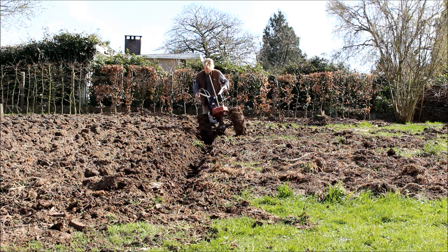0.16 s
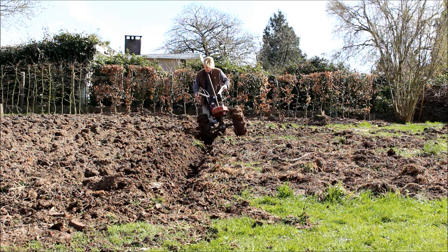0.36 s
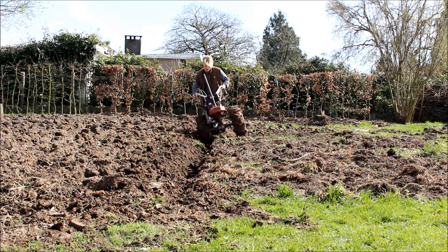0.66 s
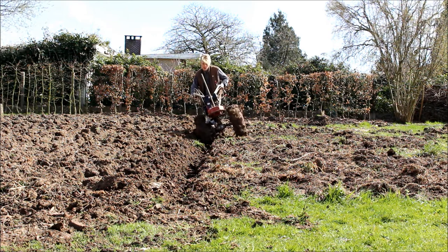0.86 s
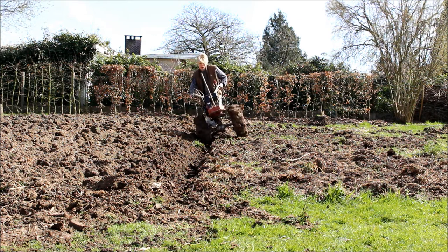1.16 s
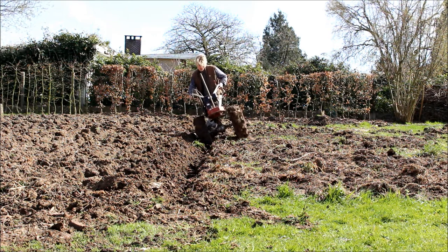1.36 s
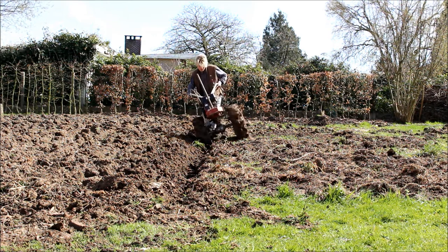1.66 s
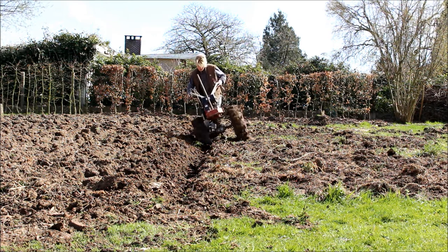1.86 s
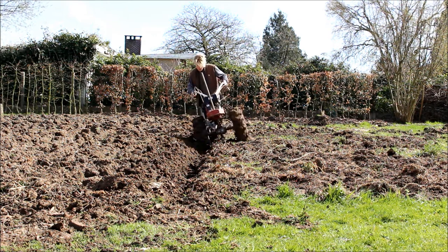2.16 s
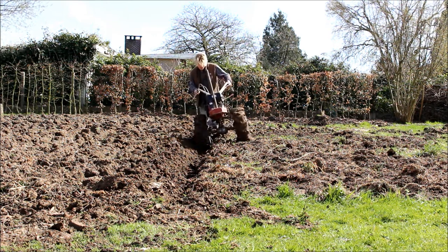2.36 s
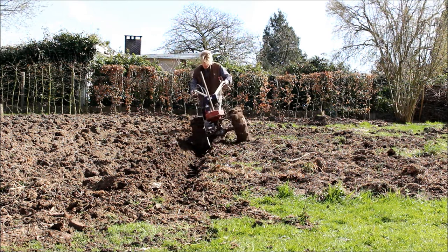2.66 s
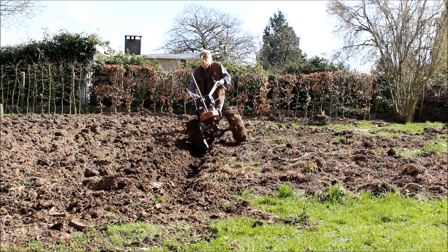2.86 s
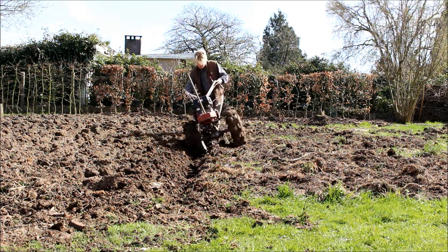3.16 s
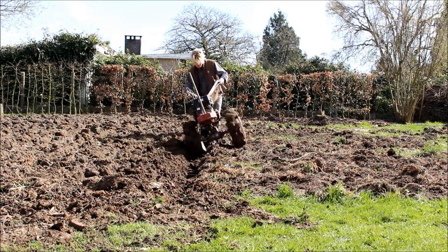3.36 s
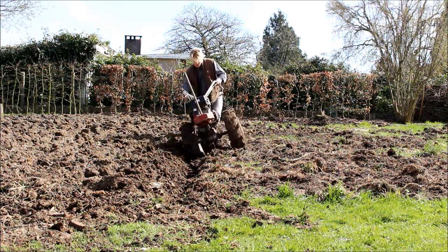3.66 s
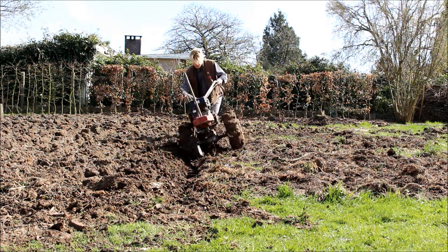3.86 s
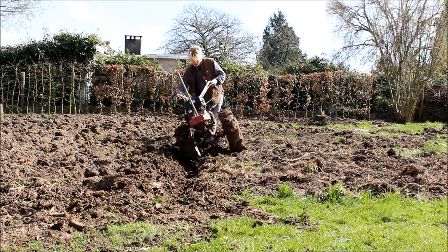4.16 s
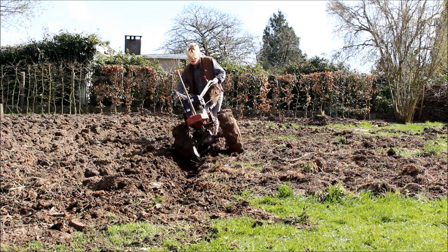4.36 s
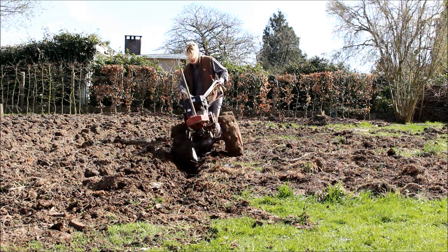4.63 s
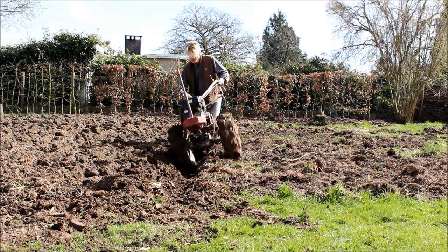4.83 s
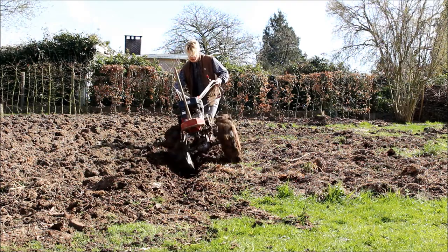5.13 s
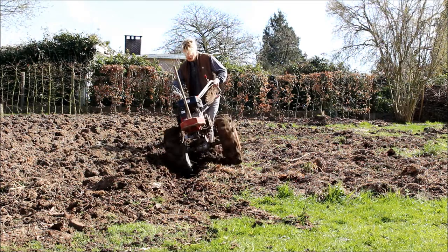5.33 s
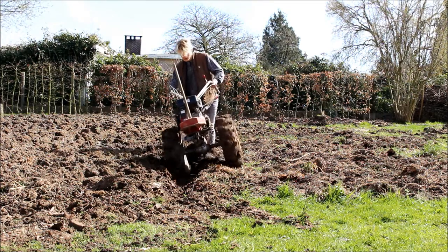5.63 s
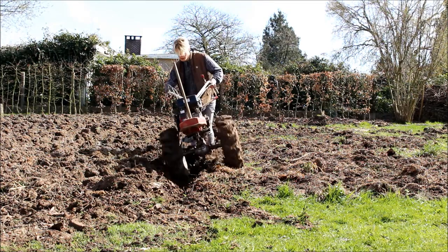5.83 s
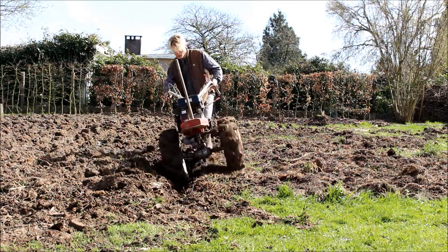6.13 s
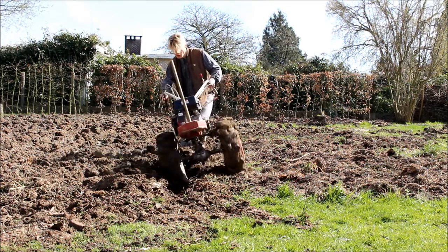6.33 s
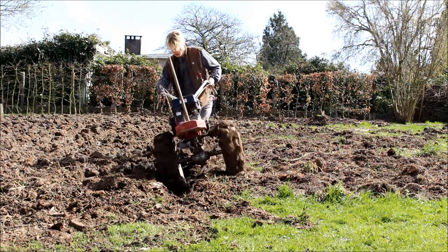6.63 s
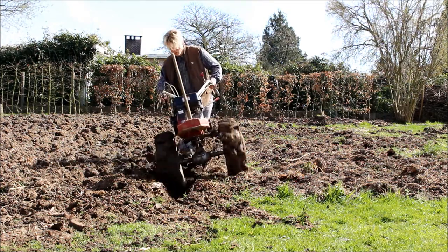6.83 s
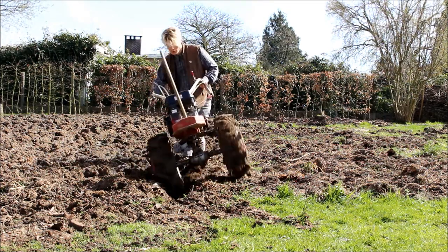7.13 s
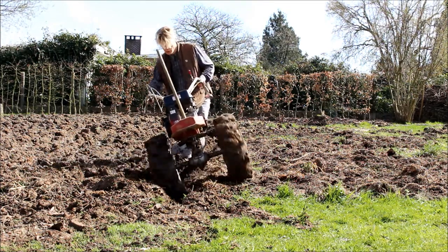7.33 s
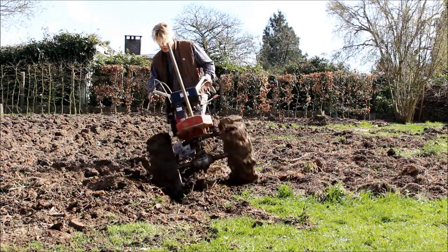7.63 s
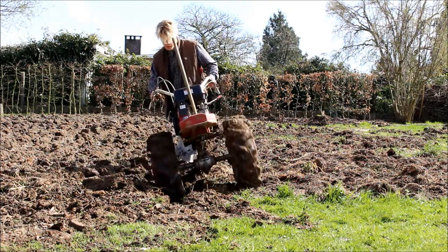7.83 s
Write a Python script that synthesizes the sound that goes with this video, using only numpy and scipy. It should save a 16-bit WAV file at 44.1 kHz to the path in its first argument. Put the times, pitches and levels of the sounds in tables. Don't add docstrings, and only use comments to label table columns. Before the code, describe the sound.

A small one-cylinder engine runs throughout in an open garden, firing nearly thirty times a second in a dry, rapid putter. Tin covers rattle, a broad fan and casing roar throbs with the firings, and a faint gear whine rides along. About twice a second the revs sag, then the throttle kicks and a few harder knocks crack out. From 0 to 1 s the engine is mostly clear with slight wind. From about 1.1 to 2.9 s, low gusts flutter, thump and tear at the camera microphone, mainly on the right, ducking the motor. From 3 to 4.8 s it returns clearly, with isolated left-side puffs. Gusts buffet again from 5 to 6.6 s, around stronger knocks. From 6.7 to 8 s the wind is lighter and the engine closer, fuller in the mids and still surging, without stopping. Close hedges and soil give slight scattered reflections.

```python
import sys
import numpy as np
from scipy import signal
from scipy.fft import rfft, irfft, next_fast_len
from scipy.io import wavfile
from scipy.ndimage import uniform_filter1d

SR = 44100
rng = np.random.default_rng(int(sys.argv[2]) if len(sys.argv) > 2 else 0)


def voltage_ratio(level):
    return 10 ** (np.asarray(level, float) / 20)


def store_pcm(level_fs):
    pcm = np.round(np.clip(level_fs, -1, 1) * 32767).astype(np.int16)
    wavfile.write(sys.argv[1], SR, np.atleast_2d(pcm).T)


N = 352359
TIME = np.arange(N) / SR
CREST_HZ = 29.79

# time of lowest speed in seconds, sag in Hz, recovery in seconds,
# throttle kick in dB.
HUNTS = [(-.05, 1.4, 0.18, 20), (0.391, 1.9, 0.13, 2.5), (.77, 2.02, 0.21, 12.5), (1.18, 2.2, 0.17, 9),
         (1.528, 2.0, 0.14, 6), (1.87, 1.13, .2, 3), (2.249, 1.15, 0.252, 4), (2.63, 0.74, 0.19, 4),
         (2.869, 0.825, 0.26, 9), (3.289, 1.9, 0.18, 18), (3.67, 1.11, 0.25, 3), (4.12, 2.1, .14, 11),
         (4.361, 0.89, .2, 9), (4.83, 1.54, 0.099, 23), (5.21, 1.1, .22, 11.5), (5.671, 2, 0.11, 23),
         (6.141, 2.27, .14, 21), (6.572, 2.37, 0.13, 23), (6.99, 2.2, .2, 13), (7.429, 2.26, .18, 19),
         (7.881, 2.08, 0.24, 20), (8.3, 2.5, .2, 8)]
# multiple of the firing rate, level in dB with throttle shut, level in dB with it open.
EXHAUST = [(2, -45, -47.5), (4, -49, -44), (5, -35, -39), (6, -46, -38), (7, -45, -42), (8, -35, -43),
           (9, -45, -36), (10, -44, -41), (11, -48, -48), (12, -51, -48), (13, -57, -49), (14, -55, -46),
           (17, -56, -55), (19, -58, -50)]
# time in seconds, peak in dB.
KNOCKS = [(0.4485, -30), (0.6839, -29), (1.2035, -32), (1.5845, -33), (1.8941, -37), (2.2394, -45),
          (2.5135, -43), (2.822, -41), (3.2994, -32), (3.677, -26), (4.1586, -20.5), (4.5338, -32),
          (4.8426, -25.5), (5.665, -27), (6.1853, -22), (6.5996, -25), (7.015, -20), (7.428, -23),
          (7.9136, -30)]
# frequency in Hz, level in dB per Hz.
KNOCK_COLOUR = [(600, -49), (1300, 10), (3500, -1), (5000, -2.5), (8000, -14.5), (11000, -20), (15000, -32)]
# teeth passed per firing, level in dB, width in Hz.
GEARS = [(80.12, -31.5, 50), (118.5, -41.5, 55)]
# frequency in Hz, level in dB, t60 in seconds, moment in the cycle from 0 to 1.
COVERS = [(1241, -13, 0.035, 0.7), (1455, -4.5, 0.036, .07), (1741, -2.5, 0.075, 0.3), (2110, 0, 0.029, 0),
          (2795, 2, 0.011, .86), (3390, -4, 0.051, .5), (4166, -8, 0.012, 0.3), (5100, -51, 0.019, 0.2),
          (5735, -13, 0.0048, .06), (6740, -23.5, 0.017, 0.4), (8340, -27, 0.03, 0.2),
          (10130, -28, 0.0064, .05)]
# frequency in Hz, level in dB per Hz.
ROAR = [(30, -39), (60, -5), (250, -6.5), (600, -4), (1000, -13.5), (1250, -1), (2000, 0.5), (3500, -8),
        (4500, -19.5), (6000, -23), (7100, -28.5), (8500, -34.5), (10000, -38.5), (16000, -55.5)]
# frequency in Hz, gain in dB.
BODY = [(200, -29), (380, 0.5), (550, 3.5), (800, -16.5), (1100, -47)]
# time in seconds, gain in dB.
NEAR = [(0, -0.5), (.5, 2), (1.0, 1), (1.5, 0.5), (2.0, 2), (2.5, -1.5), (3.0, 1), (3.3, 0.5), (3.6, 1.5),
        (4.0, 0), (4.5, 2.5), (5.0, 2.5), (5.5, 2.5), (6.0, -1), (6.5, -0.5), (7.0, 1.5), (7.5, 1),
        (8.0, 1)]
# frequency in Hz, level in dB.
SCATTER = [(60, 6.5), (300, -4.5), (1200, -18.5), (3000, -7.5), (6000, -4.5), (15000, -4)]
# frequency in Hz, difference in dB.
LEAN = [(60, -14), (110, 13), (200, -3.5), (380, -4.5), (700, -3), (1290, -2), (2380, -1.0), (4400, 2),
        (8120, 0), (15000, 1)]
# start in seconds, hold in seconds, level in dB, share on the left port from 0 to 1,
# tearing edge in dB.
GUSTS = [(0.188, 0.044, -22, 0.3, -5), (.8, 0.09, -26, .7, -5), (1.315, 0.052, -9.5, 0.2, 0),
         (1.641, 0.053, -3, 0.01, 3.5), (1.953, .12, -24, .85, -3), (2.153, 0.13, -5.5, 0.17, -3),
         (2.239, 0.17, 1.5, .02, 5), (2.465, 0.17, -3, 0.11, 3.5), (2.68, .18, -7, 0.1, -4),
         (4.858, .04, -19, 0.65, -2), (5.033, 0.28, -15.5, 0.05, -8), (5.559, 0.024, -7, 0.27, 4),
         (5.93, 0.053, -14, 0.16, 10), (5.997, 0.163, -16.5, 0.47, 4), (6.2, 0.043, -16, 0, 1),
         (6.288, 0.047, -14, 0.16, 12), (6.406, 0.16, -16.5, 0.47, 7), (6.707, 0.16, -31, 0.5, 7),
         (7.333, .05, -29, 0, -3), (7.812, .03, -15, .6, 2)]
# time in seconds, peak in dB, length in ms, frequency in Hz.
WINDWARD = [(1.076, -5.5, 5.5, 239.5), (1.33, 3, 19, 203), (1.427, -1, 25, 220), (1.482, -5, 28, 199),
            (1.554, -6.5, 33, 221), (1.623, -17, 6.5, 214), (1.654, -2.5, 19, 357), (1.681, -1, 19, 295),
            (2.149, -7, 55, 268.5), (2.235, -1, 11, 355), (2.36, 2, 6.3, 476), (2.398, 0, 10, 420),
            (2.478, -2, 19, 307), (2.54, -1, 9.5, 245), (2.606, -11, 16, 236), (2.683, -3.5, 38, 199),
            (2.707, -3, 24, 246), (2.743, -2, 49, 266), (2.782, -7, 8.4, 447), (5.047, -3.5, 19.9, 196),
            (5.094, -3.5, 47, 172), (5.162, -10.5, 30, 156), (5.212, -5, 16, 198), (5.28, -12, 45, 166),
            (5.547, -8, 24, 230), (5.599, -7.5, 19, 258), (5.836, -11.5, 23, 196), (5.965, -19, 23, 398),
            (6.05, -8, 5.97, 233), (6.288, -12, 12, 450)]
# time in seconds, peak in dB, length in ms, frequency in Hz.
LEE = [(.645, -15, 13, 128), (1.206, -18, 32, 167), (1.874, -16, 16, 139), (2.007, -24, 19, 155),
       (2.042, -16, 32, 203), (3.648, -14, 11, 172), (4.367, -20, 28, 160), (4.7, -23, 36, 132),
       (5.319, -17, 88, 193), (6.54, -20, 24, 192), (1.287, -11.5, 14, 160), (1.584, -13, 58, 179),
       (1.754, -13, 49, 205), (1.776, -13.5, 67, 193), (1.964, -10, 12.7, 125.9), (2.556, -8, 15, 262),
       (3.239, -23, 35, 150), (3.407, -13, 51, 122), (3.57, -6, 11, 180), (3.727, -1, 10.6, 211),
       (4.274, -2.5, 12.6, 199), (4.859, -1.5, 19, 186), (5.668, -7, 22, 145), (6.146, -1.5, 9.8, 179),
       (6.411, -22, 20, 158), (7.827, -8.5, 20, 180)]
# frequency in Hz, level in dB per Hz.
RUMBLE = [(24, -46), (40, -23), (152, 7), (287, 2.5), (377, -4), (460, -7.5), (642, -28.5), (843, -42),
          (1500, -51), (1950, -66), (3300, -120)]
# frequency in Hz, level in dB per Hz.
TEAR = [(150, -36), (400, -1.5), (700, -14), (1000, -25), (1500, -32), (3000, -100)]
# frequency in Hz, gain in dB.
HOUSING = [(1750, 0.5), (1900, -8), (2050, -3.5), (2950, -4.5), (3120, -5), (3270, -1.5), (6050, -3.5),
           (6380, -11.5), (6750, 1.5), (14000, -6), (15600, -6)]


def evened(x):
    return x / np.sqrt(np.mean(x ** 2) + 1e-20)


def read(points, hz):
    f, value = np.transpose(points)
    return np.interp(np.log(hz + 1), np.log(f + 1), value)


def coloured(x, points, scale=0.83):
    size = next_fast_len(N)
    gain = voltage_ratio(scale * read(points, np.fft.rfftfreq(size, 1 / SR)))
    return irfft(rfft(x, size) * gain, size)[..., :N]


def drift(seconds):
    size = max(round(seconds * SR / 16), 1)
    coarse = rng.standard_normal(N // 16 + 2)
    coarse = uniform_filter1d(uniform_filter1d(coarse, size), size)
    return np.interp(np.arange(N) / 16, np.arange(len(coarse)), evened(coarse))


def smooth(x, seconds):
    r = np.exp(-1 / (seconds * SR))
    return signal.lfilter([1 - r], [1, -r], x)


def governor():
    rise_bend, sag_bend = 1.4, 1.8
    kick_s, shut_db, shut_bend = 0.05, 3, 1.3
    low_s, sag_hz, rise_s, kick_db = np.transpose(HUNTS)
    k = np.clip(np.searchsorted(low_s, TIME) - 1, 0, len(low_s) - 2)
    since = TIME - low_s[k]
    climbing = np.clip(1 - since / rise_s[k], 0, 1)
    falling = np.clip((since - rise_s[k]) / (low_s[k + 1] - low_s[k] - rise_s[k]), 0, 1)
    hz = CREST_HZ - sag_hz[k] * climbing ** rise_bend - sag_hz[k + 1] * falling ** sag_bend
    u = np.maximum(since, 0) / kick_s
    effort_db = kick_db[k] * u * np.exp(1 - u) + shut_db * falling ** shut_bend
    return uniform_filter1d(hz, size=1000), uniform_filter1d(effort_db, size=600)


def crank(hz):
    knock_moment = 0.04928
    turns = np.cumsum(hz) / SR
    knock_s = np.transpose(KNOCKS)[0]
    late = np.unwrap((np.interp(knock_s, TIME, turns) - knock_moment) % 1, period=1)
    return turns + 10 - np.interp(TIME, knock_s, late)


def exhaust(turns, hz):
    sag_hz = np.interp(TIME - .035, TIME, 29.3 - hz)
    opening = np.clip(sag_hz, 0, 1)
    swell_db = 1.3 * drift(.08)
    slip = .02 * drift(.06)
    note = np.zeros(N)
    for k, shut_db, open_db in EXHAUST:
        db = shut_db + (open_db - shut_db) * opening + np.roll(swell_db, 9001 * k)
        lag = k ** 2 / 18 + np.roll(slip, 9001 * k)
        lag += (.25, .3, 0)[k % 3]
        note += voltage_ratio(db) * np.cos(2 * np.pi * (k * turns + lag))
    return voltage_ratio(2.0) * note


def knock():
    gap_s, fade_db = .0352, -2.5
    attack_s, decay_s = 0.00056, 0.0064
    blows = np.zeros(N + SR)
    start_s, peak_db = np.transpose(KNOCKS)
    for n in range(4):
        at = np.round((start_s + n * gap_s) * SR).astype(int)
        blows[at] = voltage_ratio(peak_db + n * fade_db)
    t = np.arange(1500) / SR
    burst = np.exp(-t / decay_s) * (1 - np.exp(-t / attack_s))
    shape = signal.oaconvolve(blows, burst)[:N]
    colour = irfft(voltage_ratio(read(KNOCK_COLOUR, np.fft.rfftfreq(256, 1 / SR))))
    colour = np.roll(colour, 128) / np.linalg.norm(colour)
    return voltage_ratio(-1) * signal.oaconvolve(rng.standard_normal(N) * shape, colour, "same")


def gears(turns, effort_db):
    surge = .0017 * np.sin(2 * np.pi * turns + .7)
    whine = np.zeros(N)
    for teeth, db, width_hz in GEARS:
        backlash = .11 * drift(.35 / width_hz)
        level = voltage_ratio(db + 2.0 * drift(0.0033)) * np.sqrt(2)
        whine += level * np.cos(2 * np.pi * (round(teeth) * (turns + surge) + backlash))
    return whine * voltage_ratio(-.3 * effort_db)


def clatter(turns, effort_db):
    t = np.arange(2500) / SR
    rattle = np.zeros(N)
    strength_db = 0.72 * rng.standard_normal((N // 1400 + 30, len(COVERS)))
    strength_db += 2.0 * rng.standard_normal((len(strength_db), 1))
    for k, (hz, db, t60, moment) in enumerate(COVERS):
        since = turns + 1 - moment
        shower = np.exp(-(since % 1) / 0.059) + 0.2
        shower += 0.075 * np.exp(-((since + .5) % 1) / 0.012)
        knocks = 0.29 * rng.laplace(size=N) * shower * voltage_ratio(strength_db[since.astype(int), k])
        cycle = np.floor(since)
        knocks += 1.5 * np.diff(cycle, prepend=cycle[0])
        ring = voltage_ratio(-60 * t / t60) * np.sin(2 * np.pi * hz * t) * (1 - np.exp(-t / 0.00039))
        rattle += voltage_ratio(db) * evened(signal.oaconvolve(knocks, ring)[:N])
    return voltage_ratio(-39.5 + 0.13 * effort_db) * rattle


def roar(turns, effort_db):
    throb = 1 + 1.4 * np.exp(-((turns - .05) % 1) / 0.053)
    noise = coloured(rng.standard_normal(N) * throb * voltage_ratio(1.12 * drift(0.052)), ROAR)
    return voltage_ratio(-30.5 + 0.13 * effort_db) * evened(noise)


def garden(x):
    echo_s, echo_gain, dull_hz = 0.000817, 0.39, 5200
    f = np.fft.rfftfreq(2048, 1 / SR)
    lag = np.exp(-2j * np.pi * f * echo_s)
    dull = 1 / (1 + (f / dull_hz) ** 2)
    comb = np.roll(irfft(1 + echo_gain * dull * lag), 64)
    combed = signal.oaconvolve(x, comb)[64:N + 64]
    direct = np.array([coloured(combed, LEAN, 1.0), coloured(combed, LEAN, -0.15)])
    hz, _, z = signal.stft(combed, SR, nperseg=1024)
    paths = uniform_filter1d(rng.standard_normal((4, *z.shape)), size=3, axis=2)
    paths = evened(paths[:2]) + 1j * evened(paths[2:])
    scattered = z * paths * voltage_ratio(read(SCATTER, hz))[:, None]
    return direct + signal.istft(scattered, SR, nperseg=1024)[1][:, :N]


def gusts(edge):
    calm_db, swell_db_per_s, drop_db_per_s = -46, 325, 420
    t = np.arange(N // 64 + 2) * 64 / SR
    power = np.full((2, len(t)), .5 * voltage_ratio(2 * calm_db))
    for start, hold, db, left, edge_db in GUSTS:
        off_db = swell_db_per_s * np.maximum(start - t, 0)
        off_db += drop_db_per_s * np.maximum(t - start - hold, 0)
        left = np.clip(left, 0, 1)
        power += np.array([[left], [1 - left]]) * voltage_ratio(2 * (db + edge * edge_db - off_db))
    return np.sqrt([np.interp(TIME, t, p) for p in power])


def eddies():
    windward_share, lee_share = 0.021, 0.98
    a, b, c, d, left = rng.random((20, 5)).T
    stray_s = a * (N / SR - .1)
    stray_db = -24 + 8 * (b - .5)
    stray_ms = 20 * (.5 + c)
    stray_hz = 170 * (0.8 + .5 * d)
    rows = list(np.transpose([stray_s, stray_db, stray_ms, stray_hz, left]))
    rows += [(*row, windward_share) for row in WINDWARD]
    return rows + [(*row, lee_share) for row in LEE]


def wind():
    lumps = voltage_ratio(2.5 * np.array([drift(.008), drift(.008)]))
    rumble = evened(coloured(rng.standard_normal((2, N)), RUMBLE) * lumps)
    tear = evened(coloured(rng.standard_normal((2, N)), TEAR) * lumps ** 2)
    ports = voltage_ratio(-4.5) * rumble * gusts(0) + voltage_ratio(-19) * tear * gusts(1) ** 1.17
    puffs = eddies()
    chance = rng.random((len(puffs), 4))
    t = np.arange(-1500, 1500) / SR
    for (s, db, ms, hz, left), (p, q, glide, flutter) in zip(puffs, chance):
        hump = np.exp(-(t / (.00048 * ms)) ** 2)
        bend = hz * t * (1 - 25.7 * (glide - .3) * t)
        bend += 0.12 * np.sin(2 * np.pi * (0.47 * hz * t + flutter))
        phase = 2 * np.pi * (bend + np.array([[p], [p + 0.28 + 0.5 * q]]))
        snap = np.exp(-(t / 0.0012) ** 2) * 0.25 * np.cos(2.19 * phase)
        left = np.clip(left, 0, 1)
        eddy = np.sqrt([[left], [1 - left]]) * (hump * np.cos(phase) + snap)
        at = round(s * SR) - 1500
        skip = max(-at, 0)
        ports[:, at + skip:at + 3000] += voltage_ratio(db + 1.0) * eddy[:, skip:]
    return ports - .38 * ports[::-1]


def scene():
    hz, effort_db = governor()
    turns = crank(hz)
    note = exhaust(turns, hz)
    rattle = gears(turns, effort_db) + clatter(turns, effort_db) + roar(turns, effort_db)
    filling = voltage_ratio(-4.5 - 5 * (N / SR - TIME))
    note = note + coloured(note, BODY) * filling
    rattle = rattle + coloured(rattle, BODY) * filling + knock()
    bark_db = CREST_HZ - 1 - hz
    engine = garden(rattle) + note * voltage_ratio([[1.5], [2.5]]) * voltage_ratio(bark_db)
    near_s, near_db = np.transpose(NEAR)
    return engine * voltage_ratio(np.interp(TIME, near_s, near_db) + 0.068 * effort_db) + wind()


def letting_go(over_db, db_per_s):
    return np.maximum.accumulate(over_db + db_per_s * TIME) - db_per_s * TIME


def gain_control(x):
    knee_db, slope, grip_s, quick_db_per_s = -19.5, 0.97, 0.0089, 168
    tire_s, slow_share, slow_db_per_s = 0.2, 0.96, 11
    power = smooth((x ** 2).max(0), 0.015)
    over_db = slope * np.maximum(10 * np.log10(power + 1e-12) - knee_db, 0)
    quick = letting_go(over_db, quick_db_per_s)
    slow = letting_go(slow_share * smooth(quick, tire_s), slow_db_per_s)
    return x * voltage_ratio(-smooth(np.maximum(quick, slow), grip_s))


def low_pass(x):
    return signal.sosfilt(signal.butter(12, 15710, fs=SR, output="sos"), x)


def record(dry):
    ducked = gain_control(coloured(dry, HOUSING))
    limited = ducked / (1 + (ducked / .52) ** 6) ** (1 / 6)
    return low_pass(limited)


dry = scene()
out = record(dry)
store_pcm(out)
```